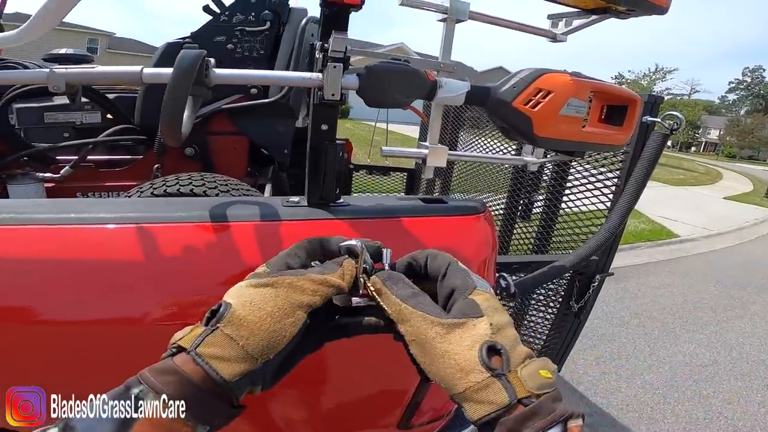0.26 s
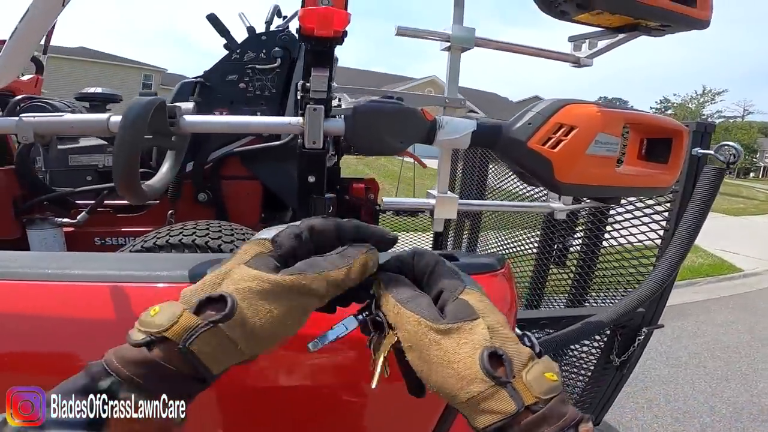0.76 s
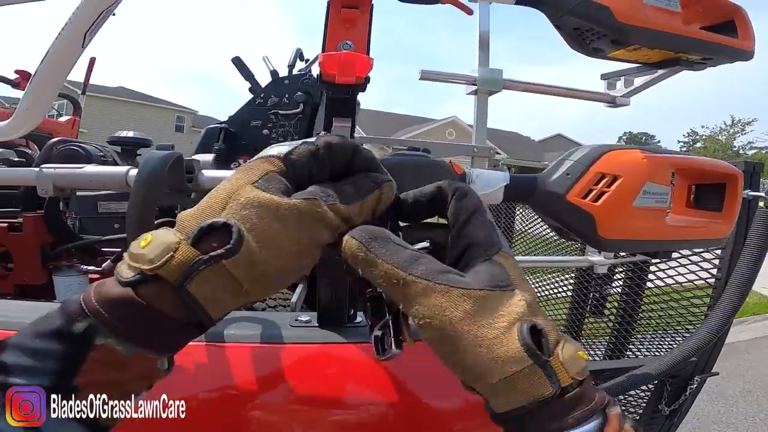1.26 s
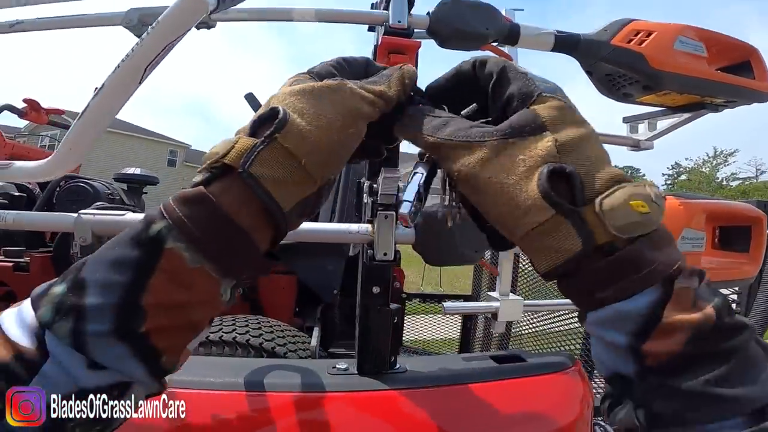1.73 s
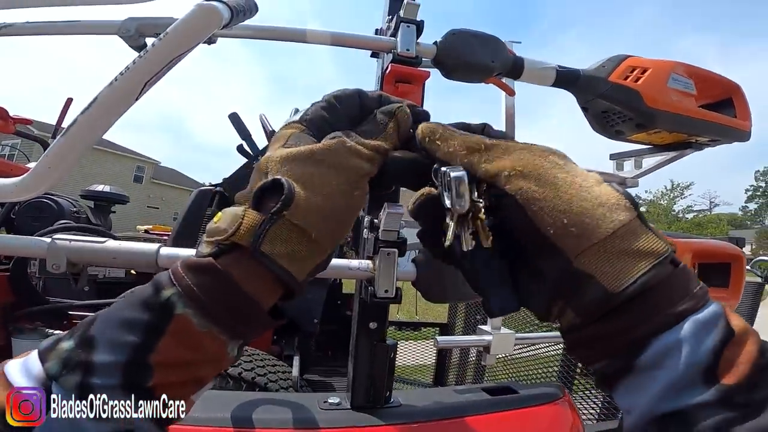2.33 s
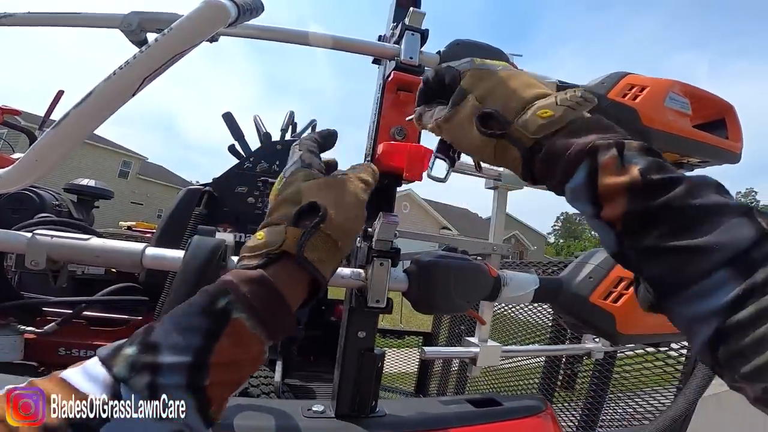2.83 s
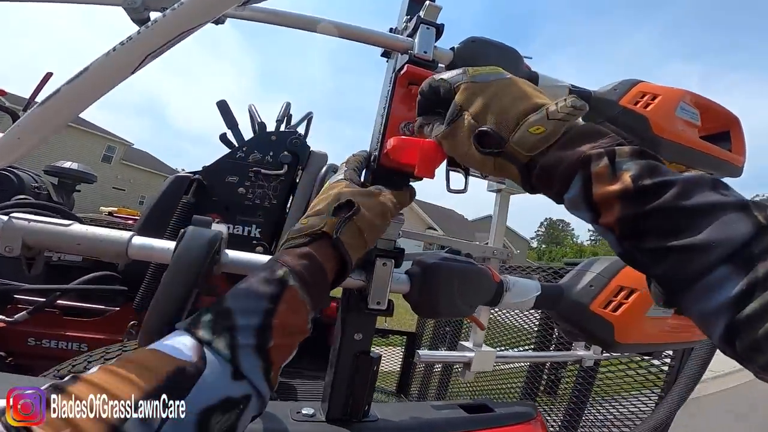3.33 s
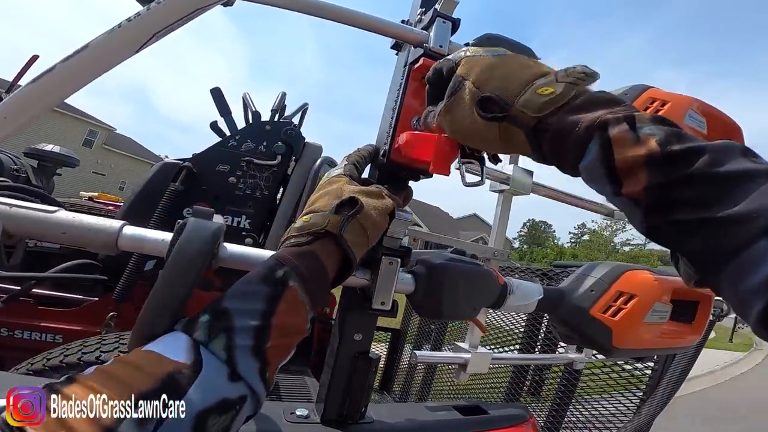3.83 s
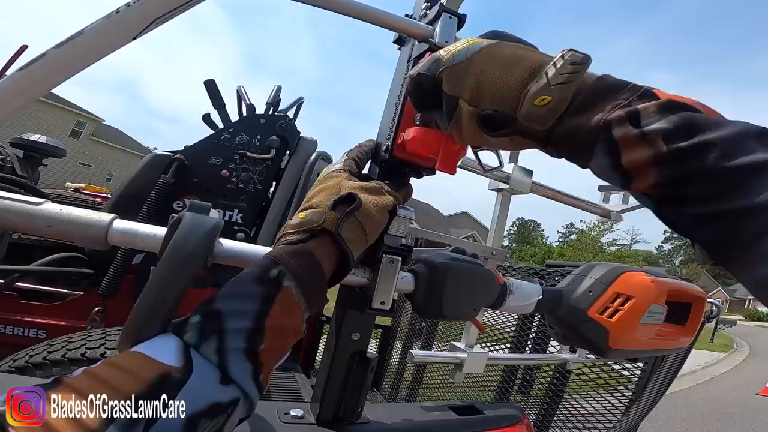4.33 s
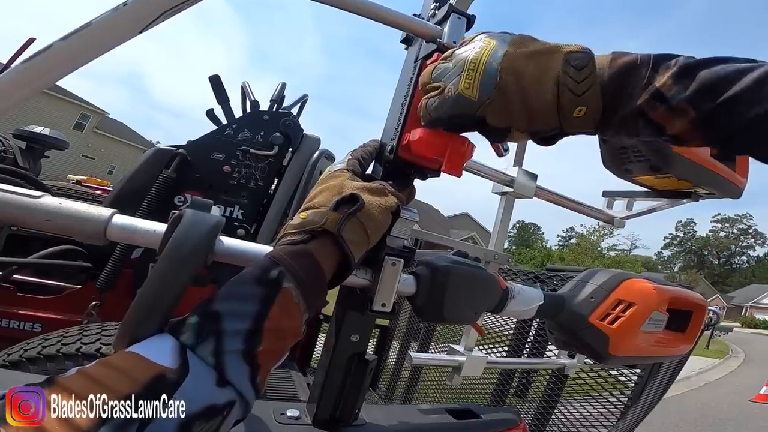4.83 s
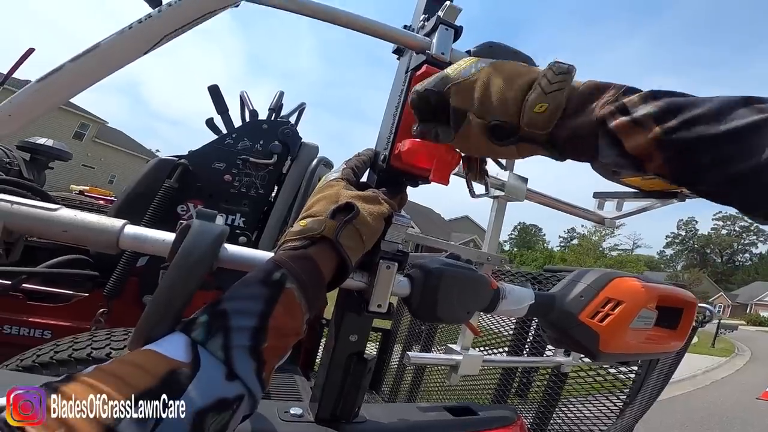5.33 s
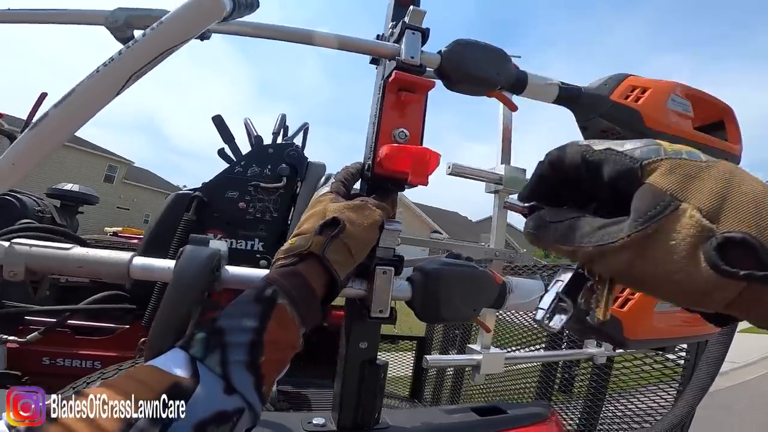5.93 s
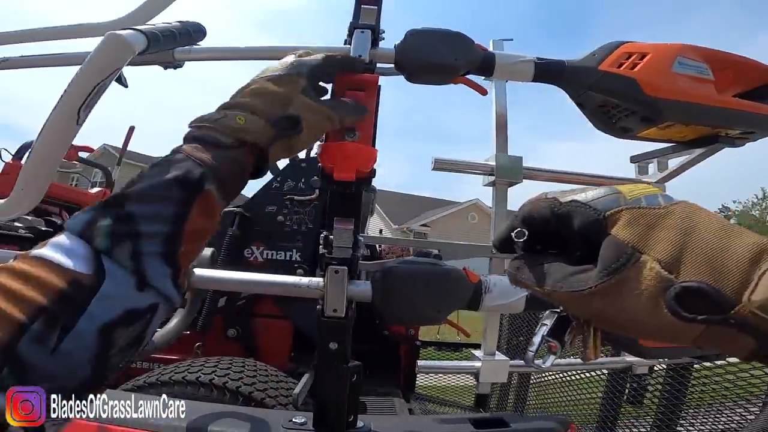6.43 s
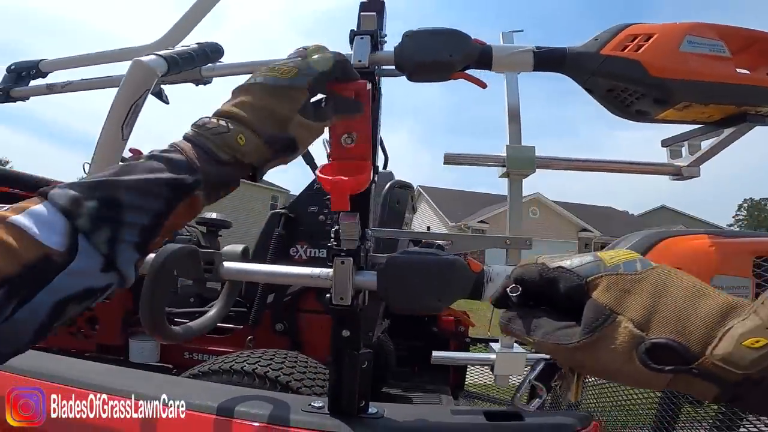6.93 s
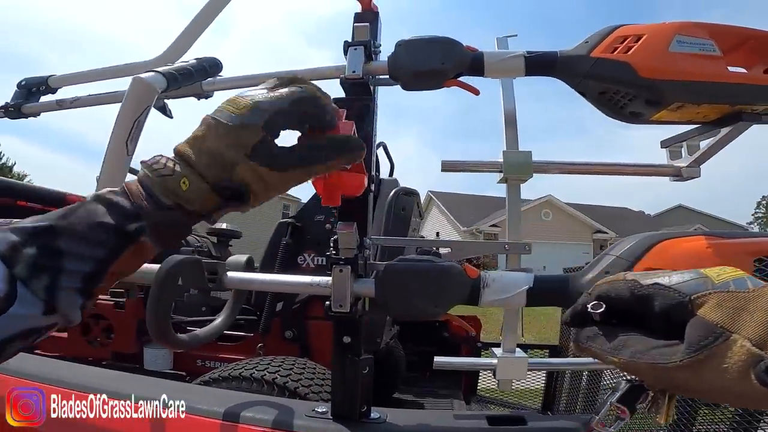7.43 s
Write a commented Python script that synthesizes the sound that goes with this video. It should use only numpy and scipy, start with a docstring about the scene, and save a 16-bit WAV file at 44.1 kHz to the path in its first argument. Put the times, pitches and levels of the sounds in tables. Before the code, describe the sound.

For the first second or so, a bunch of keys jangles, ticks and rings brightly close to the microphone, with soft glove rustle. From about 1 to 2 seconds a plastic lock housing clacks and scrapes, followed by light key taps. Between 3 and 5 seconds, separate groups of metal clicks and plastic knocks come as a key works the lock, with dull thuds from the steel rack beneath. The keys jingle and click again from 5.2 to 5.7 seconds. The loudest cluster of clacks, ending in a sharp metal snap, comes around 6.6 to 6.8 seconds, then a few small knocks. Wind rumbles on the microphone in gusts, at 1.5 and 4 seconds and more strongly from 5.5 seconds on. Low distant street noise and a motor hum continue throughout, with faint bird chirps in the first half.

```python
"""A bunch of keys, sorted by gloved hands and worked in a lock on a steel rack, close to a small stereo camera.
Held keys tick, loose ones ring and patter, and the fob taps its split ring. The plastic lock housing
clacks, the rack thuds under it, and the gloves rustle and scrape. Outdoors, beside a truck: wind
buffets the microphone ports; farther off are street noise, a humming motor and a chirping bird."""
import sys
import numpy as np
from scipy import signal
from scipy.fft import rfft, irfft, next_fast_len
from scipy.io import wavfile
from scipy.ndimage import uniform_filter1d

SR = 44100
rng = np.random.default_rng(int(sys.argv[2]) if len(sys.argv) > 2 else 0)


def wav_record(signal):
    """Record a signal, one row per channel, as 16-bit PCM in the file named by sys.argv[1]."""
    frames = np.transpose(np.atleast_2d(signal))
    bounded = np.clip(frames, -1, 1)
    # unit amplitude maps onto the largest positive 16-bit level
    quanta = np.round(bounded * 32767).astype(np.int16)
    wavfile.write(sys.argv[1], SR, quanta)


N = 338247
CONTACT_S = 0.00054  # how long a blow takes to build


def undb(db):
    return 10 ** (np.asarray(db) / 20)


def level(x, db):
    return x * undb(db) / np.sqrt(np.mean(x ** 2))


def peak(x, db):
    return x * undb(db) / np.max(np.abs(x))


def decay(t, t60):
    return np.exp(-np.log(1000) * t / t60)


def low(x, hz, order=4):
    return signal.sosfilt(signal.butter(order, min(hz, .45 * SR), fs=SR, output="sos"), x)


def band(x, hz, width):
    """Two-pole band-pass, gain 1 at the centre."""
    return signal.lfilter(*signal.iirpeak(min(hz, .45 * SR), hz / width, fs=SR), x)


def curve(table):
    """A table's columns, interpolated over the times in its first."""
    s, *columns = np.transpose(table)
    return [np.interp(np.arange(N) / SR, s, column) for column in columns]


def on_bins(table, size):
    """A table of Hz and value, spread over the bins of a transform."""
    hz, values = np.transpose(table)
    bin_hz = np.maximum(np.arange(size // 2 + 1) * SR / size, 1)
    return np.interp(np.log(bin_hz), np.log(hz), values)


def walk(rate):
    """Random levels held 1 / rate s and slewed twice; spread near 1."""
    hold = int(SR / rate)
    steps = np.repeat(rng.standard_normal(N // hold + 1), hold)
    return 1.3 * uniform_filter1d(uniform_filter1d(steps, hold), hold)[:N]


def widen(mid, side):
    return np.array([mid + side / 2, mid - side / 2])


def add(out, s, sound, db, pan_db):
    """Places a sound at its peak level, pan_db louder on the left."""
    i = int(s * SR)
    sides = undb([[pan_db / 2], [-pan_db / 2]])
    out[:, i:i + sound.shape[-1]] += peak(sound, db)[..., :out.shape[1] - i] * sides


# The street's spectrum. Each row: frequency in Hz, relative level in dB.
STREET_COLOUR = [(30, -6.5), (70, -5), (186, -16.5), (336, -33), (834, -50.5), (1100, -38), (2430, -43.5),
                 (2660, -41.5), (3040, -49), (7390, -69.5), (16000, -90)]
# How alike the two ports hear it. Each row: frequency in Hz, likeness from 0 to 1.
STREET_LIKENESS = [(40, 0.9), (100, 1), (200, 0.91), (700, 0.8), (3000, 0.07), (8000, 0.1)]


def street():
    """Distant street noise that breathes slowly, its bass alike in both ports."""
    size = next_fast_len(N)
    like = np.clip(on_bins(STREET_LIKENESS, size), 0, 1)
    spectra = rfft(rng.standard_normal((2, size))) * undb(on_bins(STREET_COLOUR, size))
    mid, side = spectra * np.sqrt([1 + like, 1 - like])
    noise = irfft(np.array([mid + side, mid - side]), size)[:, :N]
    return level(noise, -42.5) * undb(0.37 * walk(1.0))


# The motor's hum. Each row: centre in Hz, filter width in Hz, level in dB.
MOTOR_LINES = [(102, 18.2, -50), (133.3, 10, -53.5), (185.5, 9, -56)]


def motor():
    """A far motor, dead centre: narrow lines that swell and fade."""
    return sum(level(band(band(rng.standard_normal(N), hz, width), hz, width), db)
               for hz, width, db in MOTOR_LINES)


# Bird calls. Each row: start and length in seconds, first and last pitch in Hz, peak in dB before shimmer.
CHIRPS = [(0.29, 0.1, 3470, 3480, -65), (0.305, 0.075, 2500, 2050, -63), (0.365, 0.04, 2900, 2300, -64),
          (0.835, 0.09, 3300, 2650, -60), (1.085, 0.06, 2450, 2000, -60), (1.108, 0.07, 3200, 2280, -60),
          (1.3, 0.06, 2300, 2250, -61), (2.99, 0.14, 3350, 3250, -62), (3.35, 0.14, 2320, 2150, -66)]


def bird():
    """Faint gliding whistles, made unsteady by the distance, with one echo off the houses."""
    out = np.zeros((2, N))
    shimmer, wobble = undb(5.0 * walk(90)), 1 + .015 * walk(150)
    for s, length_s, start_hz, end_hz, db in CHIRPS:
        size = int(length_s * SR)
        hz = np.linspace(start_hz, end_hz, size) * wobble[int(s * SR):][:size]
        whistle = np.sin(2 * np.pi * np.cumsum(hz) / SR)
        add(out, s, signal.windows.tukey(size, .6) * whistle, db, 0)
    out *= shimmer
    return out + np.roll(out, 500)[::-1] / 2


# Wind on the microphone. Each row: time in seconds, level in dB, left minus right in dB.
WIND = [(0.0, -55, 11), (0.6, -49.5, 17), (1.41, -57, 8), (1.5, -37, -1), (2.3, -40, 6), (3.0, -44.5, 4),
        (3.76, -45, 2), (3.97, -39, -17.5), (4.29, -54, 11.5), (5.11, -49, 2), (5.4, -38, -2),
        (5.64, -33.5, 4.5), (6.71, -51.5, 7.5), (6.94, -33.5, -6.5), (7.67, -41, -0.5)]
# Eddies that slap one port. Each row: start and length in seconds, cutoff in Hz, peak in dB,
# left minus right in dB.
BUFFETS = [(3.94, 0.18, 85, -27, -12), (5.249, 0.071, 74, -28, -23.5), (5.499, 0.064, 79, -26.5, 15),
           (7.018, 0.053, 119, -32.5, -23), (7.307, 0.07, 194, -28.5, -26.5), (7.453, .12, 81, -24.5, -12)]


def wind():
    """Eddies push on each microphone port nearly on their own; a few slap harder."""
    air = rng.standard_normal((3, N))
    push = level(low(air[:2] + 0.36 * air[2], 49, order=2), 0)
    level_db, pan_db = curve(WIND)
    out = push * undb(level_db + np.array([pan_db, -pan_db]) / 2)
    for s, length_s, top_hz, db, pan_db in BUFFETS:
        eddy = low(rng.standard_normal(int(length_s * SR)), top_hz)
        add(out, s, np.hanning(len(eddy)) * eddy, db, pan_db)
    return out


# The smear of the truck's echo. Each entry: an all-pass delay in samples, at the left port.
ECHO_LAGS = np.array([37, 113, 229, 71])


def truck_echo(near):
    """The truck side returns a short smeared echo, different at each port."""
    responses = []
    for extra_lag in (0, 14):
        response = signal.unit_impulse(2048)
        for lag in ECHO_LAGS:
            loop = np.r_[1, np.zeros(int(lag) + extra_lag - 1), -.5]
            response = signal.lfilter(loop[::-1], loop, response)
        responses.append(response)
    echo = band(np.array(responses), 4200, 7000) * undb(-9.5)
    return signal.fftconvolve(near, echo, axes=1)[:, :N]


# Glove rustle. Each row: time in seconds, level in dB.
RUSTLE = [(0.0, -60.5), (0.34, -53.5), (0.83, -56.5), (1.0, -55.5), (2.16, -62.5), (4.49, -66),
          (5.28, -58.5), (7.07, -66.5), (7.67, -63.5)]
# Its colour. Each row: centre in Hz, width in Hz, gain in dB.
RUSTLE_COLOUR = [(440, 320, 20), (1740, 1080, 15), (3200, 600, 0), (7550, 4000, -23.5)]


def gloves():
    """Gloves rub unevenly all along, close to the microphone."""
    rub = rng.standard_normal((2, N)) * undb(1.8 * walk(15))
    rub = low(widen(*rub), 9600)
    cloth = sum(undb(db) * band(rub, hz, width) for hz, width, db in RUSTLE_COLOUR)
    return level(cloth, 0) * undb(curve(RUSTLE)[0])


# Drags along the lock housing. Each row: start and 60 dB fade time in seconds, starting level in dB.
SCRAPES = [(1.228, 0.26, -41.5), (4.113, 0.3, -55), (4.466, 0.38, -54.5), (5.131, 0.55, -51),
           (6.194, 0.3, -56), (7.0, 0.58, -59)]
# The hollow housing's colour. Each row: centre in Hz, width in Hz, gain in dB.
SCRAPE_COLOUR = [(1910, 950, 12.5), (5100, 570, -18), (3500, 6000, -5)]


def scrapes():
    """A glove or key drags on the housing: gritty hiss that starts at once and fades."""
    t = np.arange(N) / SR
    grit = rng.standard_normal(N) * undb(3 * walk(200))
    hollow = sum(undb(db) * band(grit, hz, width) for hz, width, db in SCRAPE_COLOUR)
    fades = sum((t >= s) * undb(db) * decay(np.maximum(t - s, 0), t60) for s, t60, db in SCRAPES)
    return level(low(hollow, 9500), 0) * fades


# Knocks on the lock. Each row: start in seconds, peak in dB, centre in Hz, 60 dB decay time in seconds,
# rack thud in dB relative to the clack.
KNOCKS = [(0.928, -31.5, 2440, 0.059, -8.5), (1.001, -30.5, 1690, 0.02, -14), (1.019, -37, 1060, 0.2, -7),
          (1.239, -28.5, 1460, 0.079, -8), (1.43, -27.5, 1800, 0.067, -43),
          (1.441, -23.5, 1830, 0.034, -20), (1.545, -42, 1460, 0.035, -26),
          (1.672, -36.5, 1780, 0.038, -19), (1.713, -27, 1620, 0.0083, -22.5),
          (1.829, -32, 1620, 0.03, -17.5), (1.875, -38.5, 1300, 0.12, -11), (1.993, -42, 1420, 0.072, -25),
          (2.982, -31, 1300, 0.078, -3.5), (3.225, -28, 1200, 0.037, -11.5), (3.239, -24, 1120, 0.11, -6.5),
          (3.522, -26, 1197, 0.088, -6.5), (3.592, -41.5, 1060, 0.089, 1), (4.535, -38, 1060, 0.1, -5.5),
          (4.741, -23, 1180, 0.051, -8), (4.759, -31.5, 1140, 0.24, -1.5), (4.797, -23, 1160, 0.054, -7),
          (4.956, -31.5, 1164, 0.16, -7), (4.971, -20, 1690, 0.023, -15), (5.184, -28.5, 1575, 0.095, -10),
          (5.225, -35.5, 1590, 0.094, -7.5), (5.253, -35.5, 1810, 0.056, -6), (5.42, -23.5, 1080, 0.051, 5),
          (5.45, -24, 1210, 0.071, -7), (6.092, -44.5, 780, 0.043, 9), (6.577, -19, 1250, 0.048, -11.5),
          (6.645, -38, 1240, 0.042, -5), (6.675, -26, 1367, 0.051, -4), (6.706, -14, 1430, 0.033, -9.5),
          (6.72, -21, 1290, 0.1, -10), (6.737, -25.5, 1553, 0.15, -8.5), (7.023, -37, 1880, 0.042, -5),
          (7.245, -45, 1156, .051, 1), (7.61, -39.5, 690, 0.041, 11)]
# The rack's resonances. Each row: centre in Hz, width in Hz, gain in dB.
RACK_MODES = [(277, 81, 8.5), (395.5, 164, 3.5), (551, 15, 0.5), (1080, 82, 0.5), (1276, 360, -11),
              (1572, 160, -6.5)]


def lock_knocks():
    """A little left of centre the plastic housing clacks; the loose steel rack thuds and buzzes."""
    out, t = np.zeros((2, N)), np.arange(8192) / SR
    push = rng.standard_normal((len(KNOCKS), 2, len(t))) * (1 - np.exp(-t / CONTACT_S))
    shake = push[:, 1] * (decay(t, 0.35) + 1.31 * decay(t, 0.034))
    rack = sum(undb(db) * band(band(shake, hz, width), hz, 3 * width) for hz, width, db in RACK_MODES)
    for (s, db, hz, t60, thud_db), blow, buzz in zip(KNOCKS, push[:, 0], rack):
        width = min(0.25 * hz, 25 / t60)  # a longer ring is a clearer note
        clack = band(blow * (decay(t, t60) + decay(t, 0.012)), hz, width)
        add(out, s, peak(low(clack, 3.7 * hz), 0) + peak(buzz, thud_db), db, pan_db=2.2)
    return out


# Taps of the fob. Each row: start in seconds, peak in dB.
FOB_TAPS = [(1.489, -41), (1.555, -39), (2.055, -49), (2.18, -47), (2.719, -43), (2.833, -44),
            (2.909, -48.5)]
FOB_HZ = 5130


def fob():
    """The fob swings back against its split ring, with the same small note each time."""
    out, t = np.zeros((2, N)), np.arange(4096) / SR
    for s, db in FOB_TAPS:
        add(out, s, decay(t, 0.031) * np.sin(2 * np.pi * FOB_HZ * t), db, pan_db=-1.2)
    return out


# Spells when the bunch dangles. Each row: start and end in seconds, top octave of a contact in relative dB.
LOOSE_SPELLS = [(0, 1.1, -16.5), (1.45, 1.6, -10.5), (1.96, 2.95, -26.5), (5.19, 5.415, -10.5),
                (5.55, 5.8, -6.5), (6.73, 6.74, -20.5)]
GRIPPED_DB = -35


def brightness_db(s):
    """The bunch is bright while loose, dull while a glove or the lock grips it."""
    return next((db for start, end, db in LOOSE_SPELLS if start <= s < end), GRIPPED_DB)


# The keys' modes. Each row: frequency in Hz, relative level in dB, 60 dB decay in seconds before scaling.
KEY_MODES = [(2900, -22, 0.12), (3278, -22, 0.12), (4592, -26, 0.15), (6164, -19, 0.3), (6810, -2, 0.085),
             (7890, -11, 0.2), (8716, -5, 0.14), (9068, -9, 0.2), (9335, 0, 0.09), (9595, -9, 0.16),
             (11235, -3, 0.077), (12000, -5, 0.12), (12290, -15, 0.15), (12760, -9, 0.093),
             (13150, -6, 0.07), (13420, -3, 0.05), (14130, -14, 0.094), (14500, -17, 0.14),
             (14930, -4, 0.09)]
BEAM_DB = 5.5


def struck_key(t, scatter_db, t60_scale):
    """All modes ring at once; where the blow lands sets each one's share, and each beams more at one port."""
    hz, db, t60 = np.transpose(KEY_MODES)[:, :, None]
    share, tuning, *beam = rng.standard_normal((4, len(KEY_MODES), 1))
    gain = undb(db + scatter_db * share + BEAM_DB * np.array(beam))
    partials = decay(t, t60_scale * t60) * np.sin(2 * np.pi * hz * (1 + tuning / 700) * t)
    return gain[:, :, 0] @ partials


# The bunch shifts or a key slides. Each row: start and length in seconds, level in dB.
FLURRIES = [(0, 0.088, -52), (0.107, 0.15, -48), (0.423, 0.067, -48.5), (0.511, 0.4, -49.5),
            (0.873, 0.23, -45.5), (1.37, 0.12, -50), (1.607, 0.11, -58.5), (1.757, 0.2, -51),
            (1.985, 0.1, -57), (2.158, 0.15, -59.5), (2.653, 0.077, -55), (5.149, 0.2, -53),
            (5.393, 0.094, -50.5), (5.559, 0.047, -53.5), (5.707, 0.034, -55)]
CONTACTS_PER_S, PATTER_HZ, PATTER_HZ_PER_DB = 420, 16500, 235


def key_patter():
    """Flurries of tiny contacts, each faintly sounding the modes of keys and fob."""
    out = np.zeros((2, N))
    contacts = (rng.random(N) < CONTACTS_PER_S / SR) * undb(3.8 * rng.exponential(size=N))
    bursts = signal.fftconvolve(contacts, decay(np.arange(1024) / SR, .009))[:N]
    patter = rng.standard_normal((2, N)) * (bursts + 0.2 * np.mean(bursts))
    patter = low(widen(*patter), 15000, order=8)
    pitches = [mode[0] for mode in KEY_MODES] + [FOB_HZ]
    chime = sum(band(patter * undb(6.0 * walk(30)), hz, 60) for hz in pitches)
    keys = level(band(patter, 3300, 5300), 0) + level(chime, -4.5) + level(band(patter, 13500, 3600), -6)
    for s, length_s, db in FLURRIES:
        top_hz = PATTER_HZ + PATTER_HZ_PER_DB * brightness_db(s + length_s / 2)
        start, end = int(s * SR), int((s + length_s) * SR)
        flurry = level(low(keys[:, start:end], top_hz), db)
        out[:, start:end] += signal.windows.tukey(end - start, .4) * flurry
    return out


# Keys swinging free. Each row: start in seconds, peak of the bunch in dB, seconds until gripped,
# then pitch in Hz and peak in dB of the key struck squarest.
RINGS = [(0.178, -56, 0.038, 9060, -39), (.207, -57, 0.022, 8010, -40.5), (0.638, -29.5, 0.032, 2814, -38),
         (0.678, -34.5, 0.045, 3210, -46), (0.719, -15, 0.075, 9350, -28.5), (0.717, -45, 0.031, 3280, -37),
         (0.798, -16.5, 0.026, 2265, -32.5), (0.94, -13, 0.051, 6220, -39.5),
         (0.955, -24.5, 0.025, 3300, -46.5), (5.202, -36, 0.05, 6150, -44), (5.274, -46, 0.012, 9335, -57)]


def key_rings():
    """Loose keys chatter and ring until a finger or a neighbour stops them; one key stands out."""
    out, t = np.zeros((2, N)), np.arange(6144) / SR
    chatter = undb(2 * walk(500))  # keys brushing each other roughen the ring
    for s, db, free_s, hz, own_db in RINGS:
        bunch = np.zeros((2, len(t)))
        for delay_s in np.append(0, rng.uniform(0, free_s / 2, size=6)):
            add(bunch, delay_s, struck_key(t, scatter_db=4, t60_scale=0.8), db=-200 * delay_s, pan_db=0)
        grip = decay(np.maximum(t - free_s, 0), 0.022) * chatter[int(s * SR):][:len(t)]
        pan_db = -1.5 + 1.515 * rng.standard_normal()
        add(out, s, grip * bunch, db, pan_db)
        add(out, s, grip * decay(t, 0.18) * np.sin(2 * np.pi * hz * t), own_db, pan_db)
    return out


# Key contacts close to the microphone. Each row: start in seconds, peak in dB, ping in Hz.
TICKS = [(0.0462, -14.5, 4770), (0.1005, -34.5, 5200), (0.138, -26.5, 6000), (0.177, -28, 4280),
         (0.2078, -26.5, 4600), (0.401, -38, 4040), (0.451, -29, 4630), (0.4686, -21, 5480),
         (0.525, -31.5, 5100), (0.564, -33, 4540), (.615, -35.5, 6000), (0.641, -16.5, 7000),
         (0.65, -22, 4700), (.66, -29, 5150), (0.6972, -21.5, 4620), (0.708, -31, 6450),
         (0.7185, -20.5, 6940), (.729, -19, 8880), (0.7693, -18, 3040), (0.798, -17.5, 7020),
         (0.84, -47, 4100), (0.8797, -42, 7800), (0.9415, -22, 8500), (.953, -21, 9500),
         (1.019, -25.5, 2720), (1.041, -18, 7100), (1.1888, -33.5, 6660), (1.309, -28.5, 5950),
         (1.3872, -33, 4300), (1.5535, -32.5, 4900), (1.829, -29, 5050), (1.8712, -29, 4130),
         (1.99, -36.5, 6260), (2.978, -33, 2330), (3.0766, -36, 5560), (3.222, -28, 4530),
         (3.2403, -32, 3340), (3.4401, -36.5, 3030), (3.5157, -22.5, 4220), (3.603, -32.5, 4650),
         (4.407, -43, 3210), (4.7415, -17, 4300), (4.759, -22, 3960), (4.968, -25, 4280),
         (5.1852, -31, 4050), (5.202, -33, 6600), (5.227, -24.5, 3460), (5.231, -22.5, 5900),
         (5.254, -23, 3680), (5.3155, -36, 4560), (5.328, -34, 3720), (5.408, -30.5, 8100),
         (5.4198, -23.5, 3440), (5.452, -19.5, 4080), (5.468, -24, 3200), (5.5975, -34.5, 3950),
         (6.576, -31, 3980), (6.6777, -29, 2390), (6.709, -24, 3930), (6.73, -29, 4060), (6.7366, -7, 4000),
         (7.002, -39.5, 3730), (7.6092, -36.5, 2740)]


def key_ticks():
    """Metal on metal: a crack, a brief pitched ping, a bright edge and the choked modes of a held key."""
    out, t = np.zeros((2, N)), np.arange(1024) / SR
    for s, db, hz in TICKS:
        push = rng.standard_normal((3, len(t))) * (1 - np.exp(-t / CONTACT_S))
        edge_db, pan_db = rng.normal(brightness_db(s), 1.5), rng.normal(-.6, 1.9)
        ping = band(push[0] * decay(t, .012), hz, hz / 18)
        crack = band(push[1] * decay(t, 0.006), hz, 0.77 * hz)
        edge = band(band(push[2] * decay(t, 0.0045), 12000, 5000), 12000, 5000)
        key = struck_key(t, scatter_db=3.5, t60_scale=0.15)
        ping_db = -5 - (db + 38) / 6  # a harder blow sounds drier
        body = low(peak(ping, ping_db) + peak(crack, 0), 1.83 * hz)
        add(out, s, body + peak(edge, edge_db) + peak(key, edge_db + 11.5), db, pan_db)
    return out


# Sound bends round the camera body and reaches the left port a little later.
# Each row: frequency in Hz, phase of the left port in radians.
PORT_PHASE = [(250, -.4), (800, -.8), (4000, -1.0), (8000, -.9), (14000, -1.3)]


def scene():
    """Keys, lock and gloves close to the camera, wind on its ports, the street behind."""
    near = key_ticks() + key_rings() + lock_knocks() + fob()
    near = near + truck_echo(near) + gloves() + key_patter() + scrapes()
    size = next_fast_len(N)
    left_lag = np.exp(1j * on_bins(PORT_PHASE, size))
    near[0] = irfft(rfft(near[0], size) * left_lag, size)[:N]
    return near + wind() + motor() + bird() + street()


def record(dry):
    """The camera cuts the deepest bass, droops in the highest treble and stops at 16.3 kHz."""
    bass_cut = signal.butter(2, 16, "highpass", fs=SR, output="sos")
    top_cut = signal.ellip(8, .2, 70, 16300, fs=SR, output="sos")
    drooped = low(signal.sosfilt(bass_cut, dry), 13500, order=2)
    return signal.sosfilt(top_cut, drooped)


dry = scene()
out = record(dry)
wav_record(out)
```